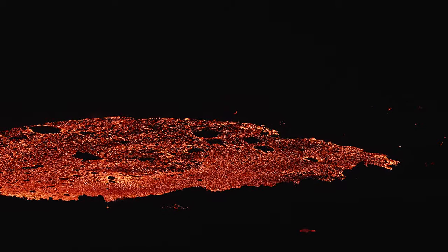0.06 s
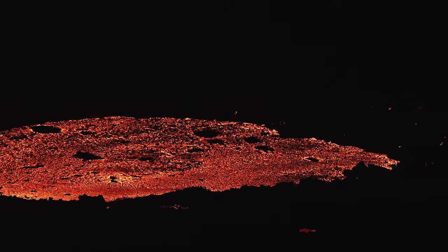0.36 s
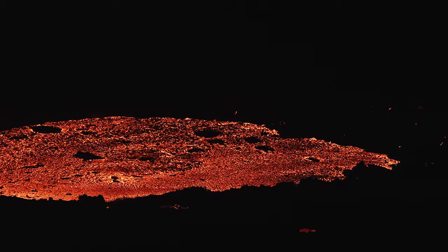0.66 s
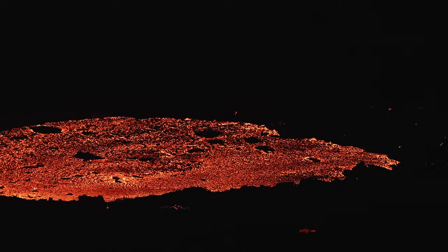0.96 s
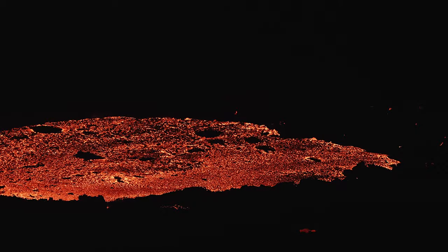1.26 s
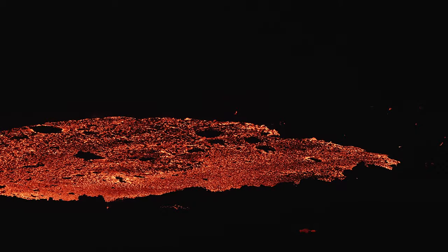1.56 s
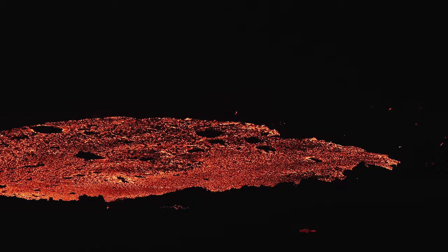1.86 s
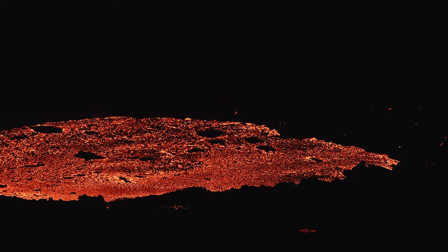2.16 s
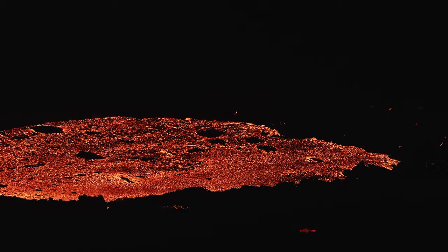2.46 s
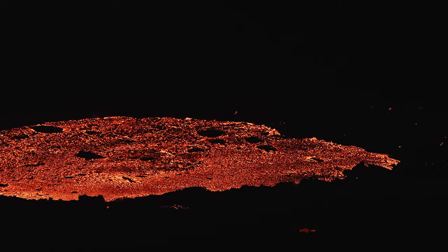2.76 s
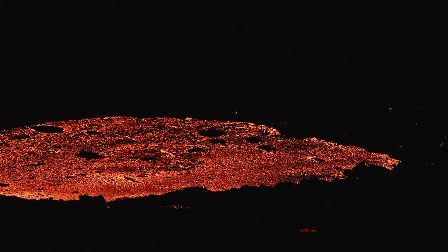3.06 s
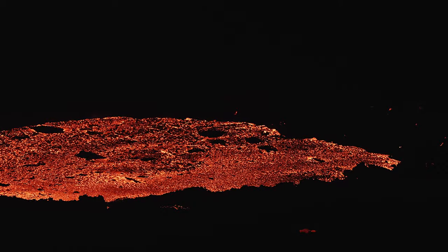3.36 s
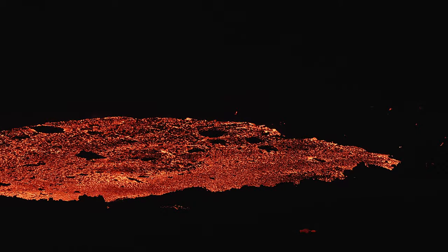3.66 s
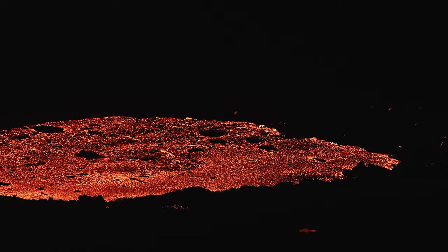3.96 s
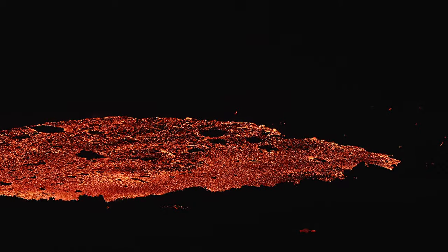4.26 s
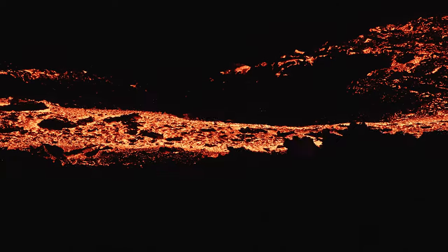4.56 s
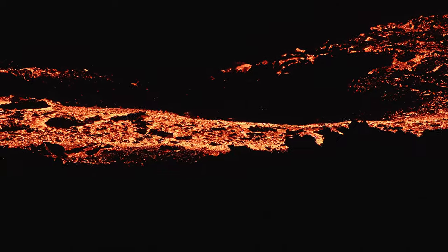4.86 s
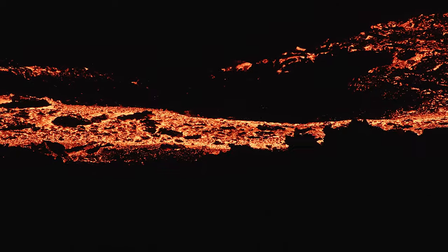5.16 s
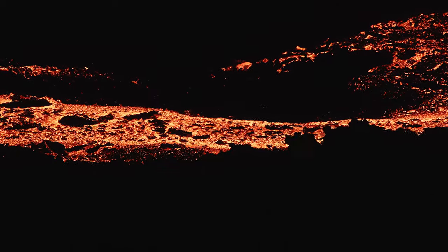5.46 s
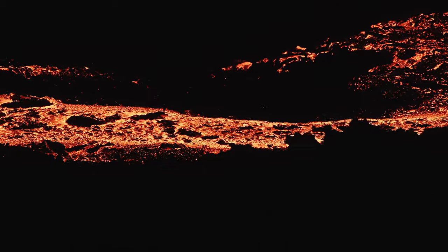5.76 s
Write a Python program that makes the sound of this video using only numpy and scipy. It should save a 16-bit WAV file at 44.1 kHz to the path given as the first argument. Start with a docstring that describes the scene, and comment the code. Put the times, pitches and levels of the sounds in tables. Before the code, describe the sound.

Out in open country, distant lava makes a steady, dull rush with a soft hiss of gas. Wind blows right on the microphone throughout, rumbling deeply and hitting it with irregular gusts and low thumps. The lava surges now and then, and a few muffled slaps of falling spatter carry over. In the last second and a half the lava sounds calmer while the gusts continue.

```python
"""Open country at night, the microphone far from churning lava and out in the wind. From the start, gas and
spray make a steady rush over a deep rumble, and gusts buffet the microphone. From 0.6 s the strongest eddies
hit it as single thumps, and the fountain surges now and then. Between 0.8 and 4.6 s a few slaps of falling
spatter carry over, dulled by the distance. After 4.5 s the rush drops and sounds calmer, while the gusts keep
coming."""
import sys
import numpy as np
from scipy import signal
from scipy.fft import rfft, irfft
from scipy.io import wavfile
from scipy.ndimage import uniform_filter1d

SR = 44100
rng = np.random.default_rng(int(sys.argv[2]) if len(sys.argv) > 2 else 0)


def wav_out(sig):
    """Save sig, one row per channel (or a flat mono array), as 16-bit PCM at SR to the path in sys.argv[1]."""
    wavfile.write(sys.argv[1], SR, np.round(np.clip(np.atleast_2d(sig).T, -1, 1) * 32767).astype(np.int16))


N = 265150
TIME = np.arange(N) / SR
FREQS = np.maximum(np.fft.rfftfreq(N, 1 / SR), 1)

# spectrum of the lava's gas and spray from far off: frequency_hz, relative_db
LAVA_SPECTRUM = [(130, -7.5), (290, -0.5), (410, -6.5), (550, -5.5), (800, -8.5), (1400, -14.5),
                 (1950, -22.5), (2700, -24.5), (3300, -30.5), (3900, -33), (5000, -44.5), (6500, -56),
                 (10000, -80.5)]


def undb(db):
    """Decibels to gain."""
    return 10 ** (np.asarray(db) / 20)


def unit(x):
    """Scale to rms 1."""
    return x / np.sqrt(np.mean(x ** 2))


def curve(points):
    """Join (time, value) points into a value for every sample."""
    times_s, values = np.transpose(points)
    return np.interp(TIME, times_s, values)


def colour(x, spectrum):
    """Filter by (Hz, dB) points joined on a log-frequency axis; rms 1."""
    hz, db = np.transpose(spectrum)
    gain = undb(np.interp(np.log(FREQS), np.log(hz), db))
    return unit(irfft(rfft(x) * gain, N))


def band(x, low_hz, high_hz, order=4):
    """Band-pass with smooth edges and no delay."""
    low_cut = 1 + (low_hz / FREQS) ** (2 * order)
    high_cut = 1 + (FREQS / high_hz) ** (2 * order)
    return irfft(rfft(x) / np.sqrt(low_cut * high_cut), N)


def wander(rate_hz):
    """Glide through random values, rate_hz of them a second; rms 1."""
    hold = max(int(SR / rate_hz), 2)
    steps = rng.standard_normal(N)[np.arange(N) // hold]
    return unit(uniform_filter1d(uniform_filter1d(steps, hold), hold))


def swell(start_s, length_s, attack_s, release_s):
    """An envelope that rises, holds and dies away."""
    rise = np.clip((TIME - start_s) / attack_s + .5, 0, 1)
    return rise * np.exp(-np.maximum(TIME - start_s - length_s, 0) / release_s)


def churn(x, flicker_db=0.5, surge_db=0.5):
    """Each octave of the roar flickers on its own while all of them surge together."""
    shared_db = surge_db * wander(9.7)
    octaves_hz = 110 * 2 ** np.arange(7)
    return sum(band(x, hz, 2 * hz) * undb(shared_db + flicker_db * wander(22)) for hz in octaves_hz)


def lava_rush(split_hz=1700, roar_gain_db=2.5, gas_gain_db=3):
    """Far off, countless bursting gas pockets merge into a roar; the escaping gas hisses on top."""
    # rise and fall of the roar: time_s, relative_db
    roar_levels = [(0, -30.5), (.45, -32), (.95, -30), (1.42, -35.5), (1.7, -32), (2.3, -33), (2.52, -31),
                   (2.9, -34), (3.6, -33.5), (4.05, -33), (4.35, -37), (4.5, -35.5), (4.85, -40),
                   (5.3, -37), (5.7, -37), (6.0, -35.5)]
    # rise and fall of the gas hiss: time_s, relative_db
    gas_levels = [(0.0, -43), (0.48, -45.5), (0.97, -45.5), (2.02, -47.5), (2.07, -45), (2.19, -47),
                  (2.56, -44.5), (3.0, -46.5), (3.65, -44.5), (4.45, -47), (4.67, -51), (5.76, -50.5),
                  (6.01, -47)]
    # the bursts overlap so densely that only a soft grain is left
    bursts = rng.standard_normal(N) * undb(0.6 * wander(180))
    roar = churn(colour(bursts, LAVA_SPECTRUM))
    roar = unit(band(roar, 200, split_hz))
    gas = colour(rng.standard_normal(N), LAVA_SPECTRUM)
    gas = unit(band(gas, split_hz, 12000) * undb(0.59 * wander(25)))
    return roar * undb(curve(roar_levels) + roar_gain_db) + gas * undb(curve(gas_levels) + gas_gain_db)


def eddies(spectrum, span_s, evenness):
    """Turbulent pressure, partly evened out over span_s so that the gusts set its swells."""
    pressure = colour(rng.standard_normal(N), spectrum)
    power = uniform_filter1d(pressure ** 2, int(span_s * SR)) + 1e-9
    return unit(pressure / power ** (evenness / 2))


def wind_on_microphone(breeze_flutter_db=-29.5):
    """Gusts add their power to the breeze; large eddies boom and small ones flutter above them."""
    # boom of the steady breeze under the gusts: time_s, level_db
    breeze = [(0, -22), (1.4, -23.5), (2.3, -24), (2.9, -25), (4.1, -22.5), (4.65, -27), (5.3, -24),
              (6.0, -24)]
    # gusts buffeting the microphone: start_s, length_s, boom_db, flutter_db
    gusts = [(0.0, 0.027, -15.5, -31.5), (0.152, 0.04, -24.5, -27), (0.24, 0.09, -18, -34),
             (0.524, 0.068, -20, -33), (0.612, 0.2, -29, -22.5), (0.868, 0.11, -21.5, -21.5),
             (1.144, 0.063, -24, -29), (1.647, 0.055, -18.5, -30), (1.786, 0.18, -22, -29.5),
             (2.054, .12, -25.5, -26), (2.257, 0.13, -19.5, -31.5), (2.439, 0.09, -17, -30.5),
             (2.609, 0.19, -18, -44), (2.965, 0.15, -21.5, -33.5), (3.245, 0.12, -20.5, -23.5),
             (3.417, .05, -22.5, -28.5), (3.62, 0.17, -23, -25), (3.876, .11, -16, -23.5),
             (4.82, 0.14, -22.5, -32), (4.958, 0.13, -19, -37), (5.223, .18, -18.5, -29),
             (5.60, 0.027, -13.5, -43), (5.677, 0.14, -20.5, -33.5)]
    # spectrum of the large eddies: frequency_hz, relative_db
    boom_spectrum = [(10, -12.5), (22, -7.5), (50, -2.5), (95, -2.5), (130, -8), (200, -24.5), (400, -31),
                     (900, -84.5), (3000, -120)]
    # spectrum of the small eddies: frequency_hz, relative_db
    flutter_spectrum = [(70, -28), (115, 4), (150, 3.5), (215, 3), (290, -10.5), (420, -23), (900, -61),
                        (4000, -110)]
    boom_power = undb(curve(breeze)) ** 2
    flutter_power = np.full(N, undb(breeze_flutter_db) ** 2)
    for start_s, length_s, boom_db, flutter_db in gusts:
        gust = swell(start_s, length_s, attack_s=0.028, release_s=0.03)
        boom_power += (undb(boom_db) * gust) ** 2
        flutter_power += (undb(flutter_db) * gust) ** 2
    boom = eddies(boom_spectrum, span_s=0.084, evenness=0.83) * np.sqrt(boom_power)
    flutter = eddies(flutter_spectrum, span_s=0.041, evenness=0.44) * np.sqrt(flutter_power)
    return boom + flutter


def wind_thumps(width_cycles=0.6):
    """A strong eddy passes the microphone as one push with a suction on either side."""
    # the strongest eddies: centre_s, pitch_hz, peak_db
    strong_eddies = [(0.633, 128, -12), (0.724, 110, -10.5), (0.947, 95, -9.5), (1.833, 58, -9),
                     (1.931, 56, -7), (2.039, 50, -12), (2.091, 48, -8.5), (3.042, 44, -9.5),
                     (3.365, 81, -16), (3.914, 55, -13), (3.958, 85, -9), (5.013, 75, -15),
                     (5.244, 127, -10.5)]
    thumps = np.zeros(N)
    for centre_s, pitch_hz, peak_db in strong_eddies:
        cycles = (TIME - centre_s) * pitch_hz
        envelope = np.exp(-(cycles / width_cycles) ** 2 / 2)
        thumps += undb(peak_db) * np.cos(2 * np.pi * cycles) * envelope
    return thumps


def fountain_surges(low_hz=230, flicker_db=1.1):
    """The fountain throws up more lava, and a run of dull gas puffs fills out the roar."""
    # surges of the fountain: start_s, length_s, level_db, high_hz
    surges = [(0.662, 0.47, -34, 427), (1.6, 0.46, -36, 603), (2.467, 0.088, -40, 430),
              (2.98, 0.17, -35, 374), (3.306, 0.46, -30.5, 430), (5.202, 0.36, -36, 550)]
    puffs = colour(rng.standard_normal(N), LAVA_SPECTRUM) * undb(flicker_db * wander(30))
    fountain = np.zeros(N)
    for start_s, length_s, level_db, high_hz in surges:
        envelope = swell(start_s, length_s, attack_s=0.038, release_s=0.2)
        fountain += undb(level_db) * envelope * unit(band(puffs, low_hz, high_hz))
    return fountain


def spatter(rise_s=0.003):
    """Soft clots land with short noisy slaps, an octave wide and dulled by the distance."""
    # clots landing: start_s, relative_db, pitch_hz, decay_s
    landings = [(0.779, -21, 395, 0.018), (1.516, -20, 322, 0.017), (3.306, -23, 313, 0.0099),
                (4.177, -27, 352, 0.024), (4.299, -20.5, 610, 0.005), (4.412, -29.5, 890, 0.013),
                (4.478, -25.5, 895, 0.008), (4.571, -30.5, 480, 0.018)]
    slaps = np.zeros(N)
    for start_s, relative_db, pitch_hz, decay_s in landings:
        age_s = np.maximum(TIME - start_s, 0)
        envelope = (1 - np.exp(-age_s / rise_s)) * np.exp(-age_s / decay_s)
        splash = band(rng.standard_normal(N), pitch_hz / np.sqrt(2), pitch_hz * np.sqrt(2), order=3)
        slaps += undb(relative_db) * unit(splash) * envelope
    return band(slaps, 120, 3200)


def scene():
    """Lava in the distance and wind right on the microphone, in mono."""
    return (lava_rush() + spatter() + wind_on_microphone() + wind_thumps() + fountain_surges())[None]


def record(dry, hiss_db=-66, top_hz=15700):
    """The recorder adds a faint bright hiss and cuts the top."""
    # spectrum of the recorder's hiss: frequency_hz, relative_db
    hiss_spectrum = [(3000, -13.5), (8000, -7.5), (11000, -5), (13500, -2), (15700, 1)]
    hiss = undb(hiss_db) * colour(rng.standard_normal(N), hiss_spectrum)
    lowpass = signal.ellip(12, .1, 80, top_hz, fs=SR, output="sos")
    return signal.sosfilt(lowpass, dry + hiss)


dry = scene()
out = record(dry)
wav_out(out)
```